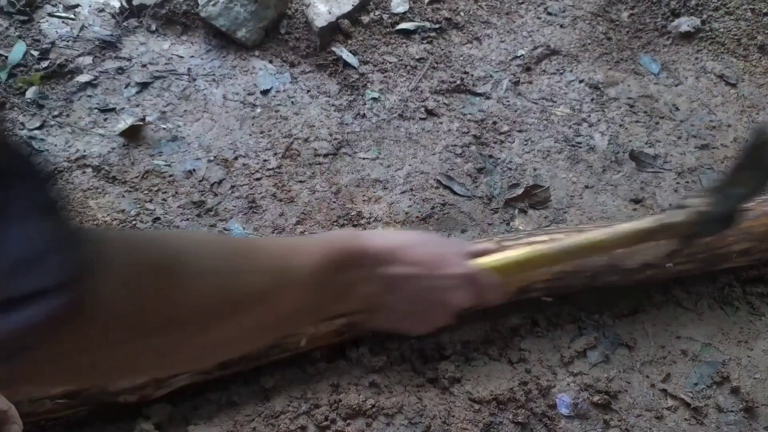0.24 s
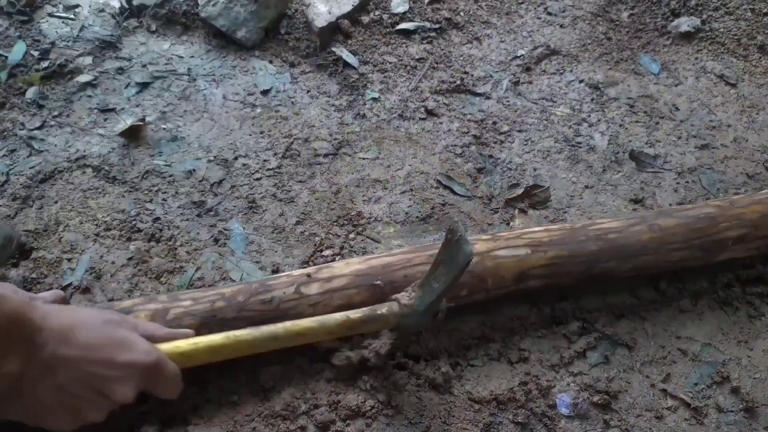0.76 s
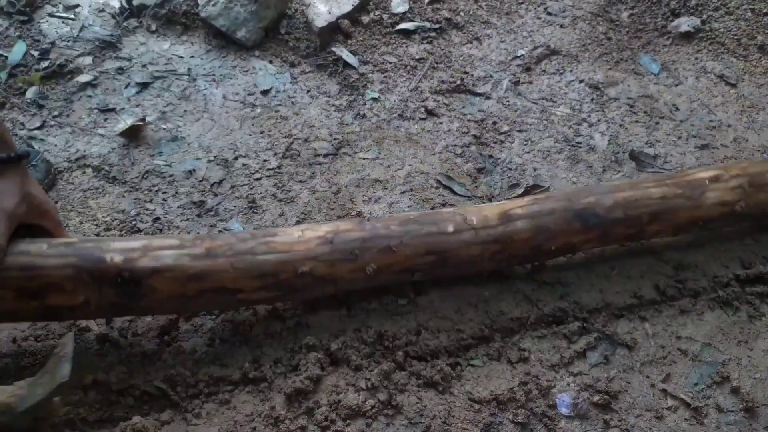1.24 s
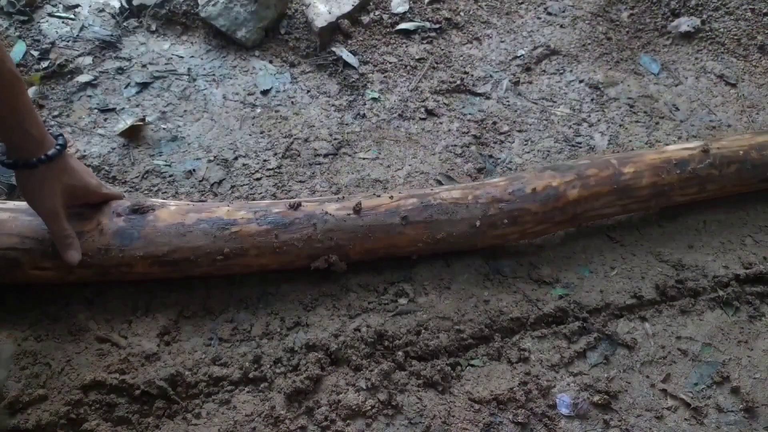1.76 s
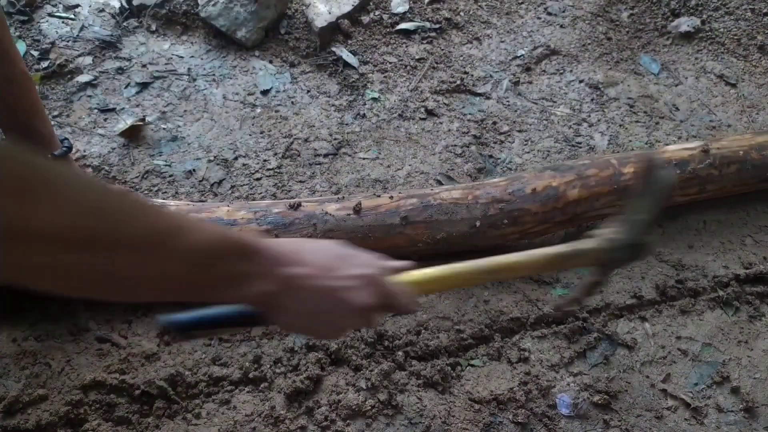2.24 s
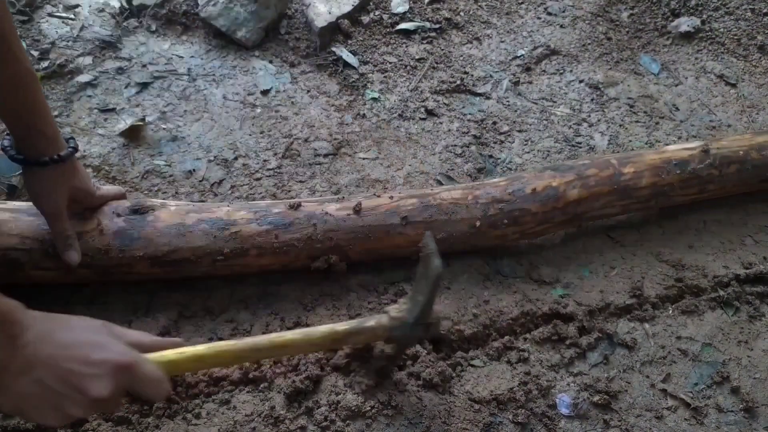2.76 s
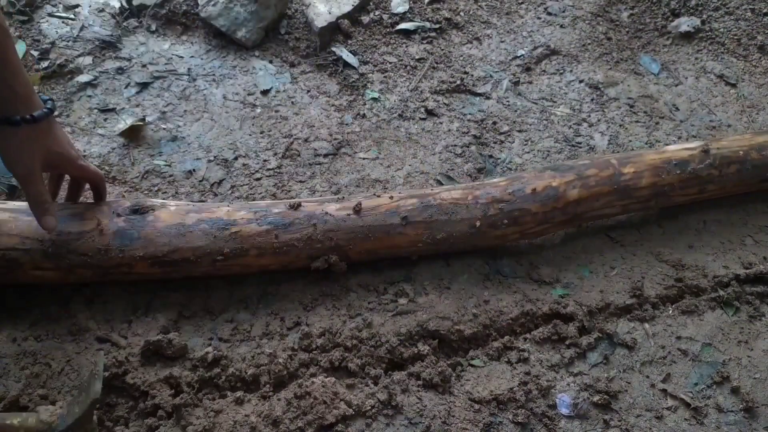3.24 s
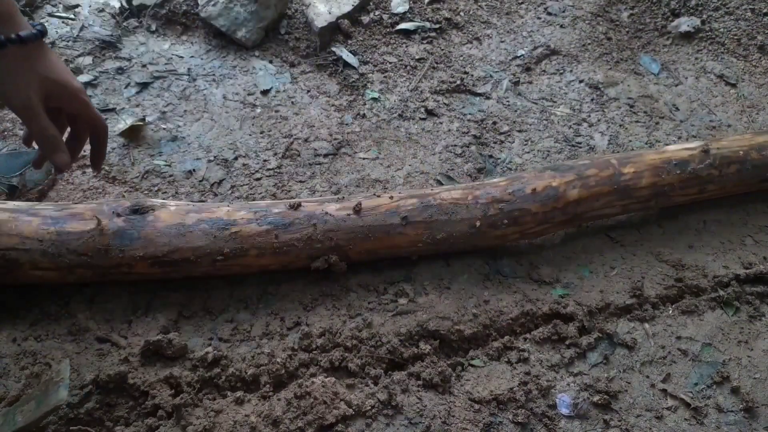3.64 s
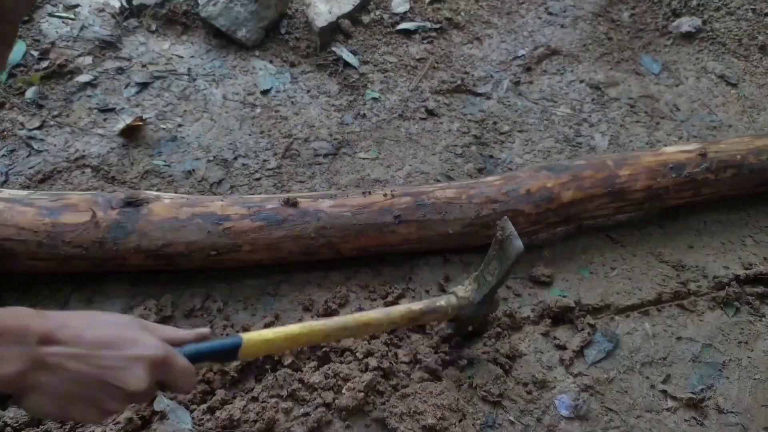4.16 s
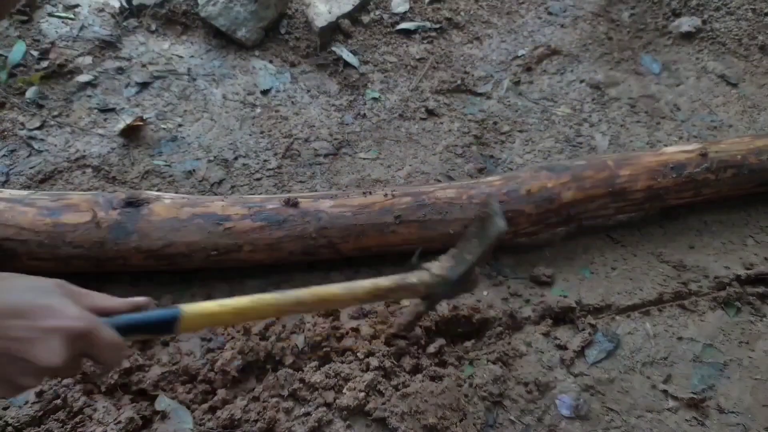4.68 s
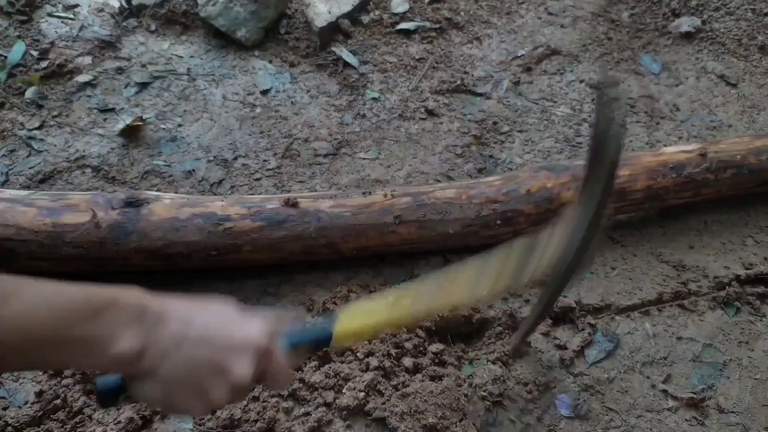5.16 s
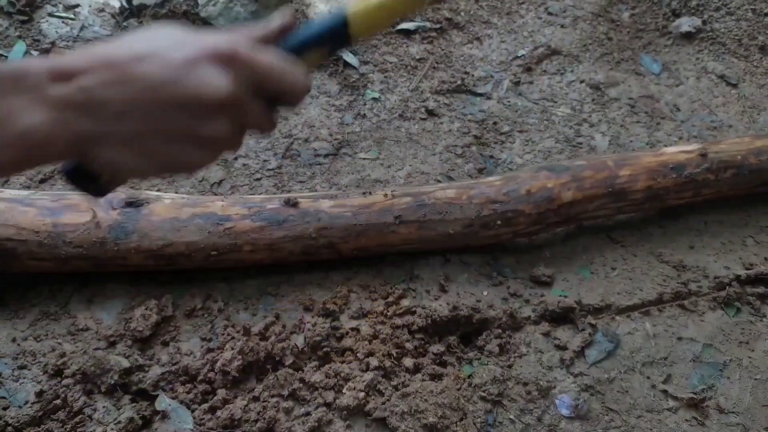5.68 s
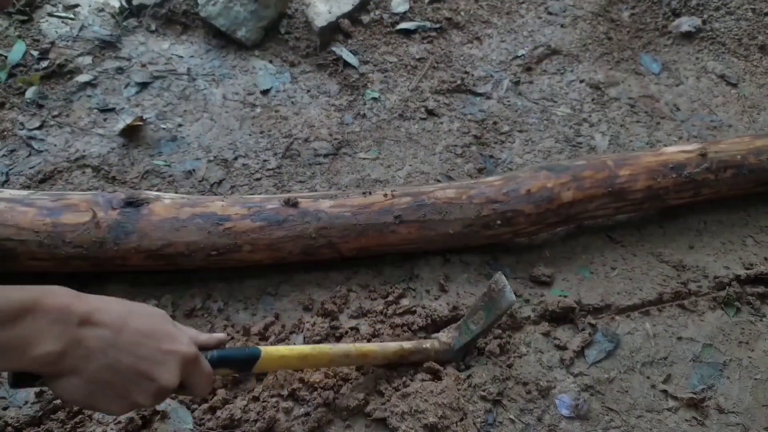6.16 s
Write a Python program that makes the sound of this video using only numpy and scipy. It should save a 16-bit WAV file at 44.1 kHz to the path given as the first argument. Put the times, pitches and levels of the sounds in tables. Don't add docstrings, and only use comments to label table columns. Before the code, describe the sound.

Scraping first: quiet gritty strokes of a pick digging a groove beside a log, with small stone clicks, soft thumps and short gaps. Then four sharp chops bite the earth, two in quick succession and two more widely spaced, each throwing a spray of soil that patters back. Thin, fluttering insects sing far behind in still air. The stereo microphone sits close, with no echo; the insect bed dips briefly after each chop.

```python
import sys
import numpy as np
from scipy import signal
from scipy.fft import rfft, irfft
from scipy.io import wavfile
from scipy.ndimage import uniform_filter1d, minimum_filter1d

SR = 44100
rng = np.random.default_rng(int(sys.argv[2]) if len(sys.argv) > 2 else 0)


def linear_from_db(decibels):
    return 10 ** (np.asarray(decibels, float) / 20)


def inscribe(sig):
    pcm = np.round(np.clip(np.atleast_2d(sig).T, -1, 1) * 32767)
    wavfile.write(sys.argv[1], SR, pcm.astype(np.int16))


N = 282681

SIDE = np.c_[[.5, -.5]]

# freq_hz, level_db, t60_s
EDGE = [(4200, -4, .005), (5200, -6, .004), (6700, -2, .008), (7600, -2, .005), (8300, -1, .008),
        (9400, -4, .004)]
# freq_hz, level_db, t60_s
BLADE = [(1300, -3, .012), (1650, -3, .01), (2060, 0, .014), (2450, -1, .011), (2900, -2, .013),
         (3500, -7, .007)]
# freq_hz, level_db, t60_s, left_right_db, left_lag_rad
GROUND = [(154.6, 8, 0.087, 0.35, 0.52), (188.7, 3, 0.069, 2, .3), (116, -2, 0.0897, 0.5, 0.6)]
# freq_hz, level_db, t60_s, left_right_db, left_lag_rad
DEEP = [(79, -9.5, 0.26, -13.5, 0.23)]
# top_s, spray_db
SPRAYS = [
    (4.103, -36),
    (4.585, -37),
    (5.183, -32.5),
    (6.016, -33.5),
]


def chops():
    # start_s, blade_db, edge_share_db, blade_pitch_hz, crush_ms
    contacts = [
        (4.0833, -10, -6, 2730, 1.6),
        (4.086, -19.5, 2, 1680, 0.93),
        (4.0965, -5, -14.5, 2180, 0.92),
        (4.0995, -13.5, -4, 1243, 2.9),
        (4.574, -10, -1, 1331, 2.2),
        (5.1733, -8, -4.5, 1980, 2.5),
        (6.0105, -12, 2, 2340, 1.2),
        (6.0137, -9, -13, 1560, 1.5),
        (6.0224, -13.5, -11.5, 2135, 2.6),
        (6.0252, -7.5, -20.5, 2055, 0.59),
    ]
    # freq_hz, level_db, t60_s
    tip = [(10900, 5.5, .004), (12800, 4.5, 0.0048), (14600, 2, 0.005)]
    # start_s, neck_db, handle_db, ground_db, deep_ground_share_db
    knocks = [
        (4.0832, -23, -29, -45, -8.5),
        (4.099, 2, -16.5, -25.5, -2),
        (4.5769, -2, -5, -15, -3.5),
        (5.176, -8.5, -6, -13, -4.5),
        (6.013, -19.5, -12, -28.5, -11),
        (6.0285, -28.5, -10.5, -21, -3.5),
    ]
    # freq_hz, level_db, t60_s, left_right_db, left_lag_rad
    neck = [(1100, -8.5, 0.029, -9.5, 0.51), (1415, -3, 0.017, 3.5, 1), (1620, -3.5, 0.014, -5, 0.94)]
    out = np.zeros((2, N))
    for s, blade_db, edge_db, blade_hz, crush_ms in contacts:
        pan_db = -9.5 - 0.62 * edge_db
        edge = lag_left(strike(EDGE, blade_db + edge_db + 10, 0.8 * crush_ms, 0.24, 5200.0))
        point = strike(tip, blade_db + edge_db - 13, 0.14 * crush_ms, 0.12)
        blade = lag_left(strike(BLADE, blade_db + 2.66, crush_ms, 0.71, blade_hz, focus_db=15.5))
        add(out, s - .0004, edge + point)
        add(out, s + 0.00064, blade * linear_from_db(SIDE * pan_db))
    for s, neck_db, handle_db, ground_db, deep_db in knocks:
        add(out, s, thud(ground_db, handle_db, deep_db))
        add(out, s, knock(neck, neck_db - 8.0, rise_ms=0.65))
    return out


def pebbles():
    # start_s, strength_db, edge_share_db
    on_point = [(0.0169, -19, -1), (0.0244, -33, -27), (0.488, -32, 1), (0.492, -33, 7),
                (0.5133, -27.5, 0.5), (0.607, -20, -8), (0.651, -26.5, -4), (0.6578, -37, 6.5),
                (0.81, -40, -8), (0.9432, -27.5, -22), (1.6574, -40, 11), (1.6744, -41, -11),
                (2.3454, -23, -2), (2.3753, -24.5, -5), (2.5075, -47, 14), (2.5227, -30, -1),
                (2.5656, -33, -6), (2.583, -25.5, -23), (2.6347, -35, 14), (2.691, -26, -5),
                (2.7237, -27, -1), (2.933, -31, -6), (3.0024, -24.5, -31), (3.0272, -25.5, -6.5),
                (3.0722, -34, 4), (4.5974, -24, -6.5), (5.4287, -29, 0)]
    # start_s, strength_db, edge_share_db
    on_flank = [(0.865, -33, -12), (0.8725, -37, -2), (0.9068, -25, -9), (0.9326, -22, -26),
                (1.1565, -48, -12), (1.2655, -42.5, 14.5), (1.4536, -35.5, 2), (1.4917, -52, 13),
                (2.9178, -43.5, 14.5), (3.1474, -32, -18), (5.3442, -23, -20)]
    edge_modes = EDGE + [(11300, -11, 0.0014), (14100, -12, .004)]
    out = np.zeros((2, N))
    for rows, blade_hz in ((on_point, 2930), (on_flank, 1930)):
        for s, db, edge_db in rows:
            pan_db = -9 + 1 * rng.standard_normal()
            crush_ms = 0.53 + 0.44 * (db + 29)
            blade = strike(BLADE, db - 5.0, crush_ms, 0.38, blade_hz, focus_db=21.5)
            edge = strike(edge_modes, db + edge_db + 4, crush_ms, 0.077, 8000., focus_db=10.5)
            add(out, s, blade * linear_from_db(SIDE * pan_db) + edge * linear_from_db(0.29 * SIDE * pan_db))
    return out


def bumps():
    # start_s, ground_db, handle_db, deep_ground_share_db
    dull = [(0.0, -39, -45, 10), (0.039, -49, -48, 17), (0.367, -45, -46.5, 3), (0.472, -70, -44.5, 6),
            (0.591, -57.5, -64, 21), (0.68, -41, -54, -1), (0.863, -39, -36.5, 3),
            (0.932, -27.5, -40.5, -9), (1.027, -36.5, -50, -17), (1.459, -33.5, -44, -0.5),
            (1.68, -33.5, -51, -6), (1.738, -37, -67, -4), (2.366, -37.5, -52, 4.5),
            (2.593, -37, -49.5, 4.5), (2.742, -40, -76, 7), (3, -37.5, -44, 0), (3.1, -42, -48, -10),
            (3.162, -36, -65, -5), (3.313, -62, -50, 2), (3.425, -44, -74, 0), (4.24, -53, -54.5, 13),
            (4.69, -43, -49, -5), (5.352, -31.5, -45, 10)]
    # start_s, level_db, freq_hz, t60_s
    shoves = [
        (1.466, -36.5, 34.6, 0.23),
        (4.101, -35, 44.7, 0.081),
        (4.579, -29, 51.6, .08),
        (5.173, -23, 57.2, .07),
        (6.021, -47, 50.6, .08),
    ]
    out = np.zeros((2, N))
    for s, ground_db, handle_db, deep_db in dull:
        add(out, s, thud(ground_db - 8.0, handle_db + 11.5, deep_db, rise_ms=1.6, tilt_db=-26))
    for s, db, hz, t60 in shoves:
        add(out, s, knock([(hz, 4, t60, -2.5, .3)], db, rise_ms=19.0))
    return out


def strike(modes, db, crush_ms, same, favour_hz=None, focus_db=8):
    t_ms = np.arange(1300) / SR * 1000
    envelope = np.exp(-t_ms / max(crush_ms, .1)) * (1 - np.exp(-t_ms / 0.032))
    crunch = pair(len(t_ms), same) * envelope
    out = signal.fftconvolve(crunch, ring(modes, 1500, favour_hz, focus_db)[None])
    return linear_from_db(db) * out / abs(out).max()


def ring(modes, size, favour_hz=None, focus_db=8):
    hz, db, t60 = np.transpose(modes)[:3, :, None]
    t = np.arange(size) / SR
    if favour_hz:
        db = db - focus_db * abs(np.log2(hz / favour_hz))
    envelope = linear_from_db(db - 60 * t / t60) * (1 - np.exp(-t * hz / .25))
    return (envelope * np.sin(2 * np.pi * hz * t)).sum(0)


def lag_left(x):
    return np.array([np.roll(x[0], 4), x[1]])


def thud(ground_db, handle_db, deep_db, rise_ms=0.69, tilt_db=0):
    # freq_hz, level_db, t60_s, left_right_db, left_lag_rad
    handle_modes = [(493, 13.5, 0.017, 1.5, 0.35), (830, -10.5, 0.075, 1, .4), (650, -4.5, 0.036, 2, 0.32),
                    (345, -2, 0.028, 4, 0.21)]
    tilted = [(hz, db + tilt_db * np.log2(hz / 400), *rest) for hz, db, *rest in handle_modes]
    out = np.zeros((2, SR // 2))
    add(out, 0, knock(GROUND, ground_db, 7.4))
    add(out, 0, knock(DEEP, ground_db + deep_db, 4.0))
    add(out, 0, -knock(tilted, handle_db - 9, rise_ms))
    return out


def knock(modes, db, rise_ms):
    hz, mode_db, t60, pan_db, lag_rad = np.transpose(modes)[:, :, None, None]
    t = np.arange(round(1.5 * SR * t60.max())) / SR
    level = linear_from_db(mode_db + SIDE * pan_db - 60 * t / t60)
    waves = level * np.sin(2 * np.pi * hz * t - SIDE * np.clip(lag_rad, -1, 1))
    return linear_from_db(db) * waves.sum(0) * (1 - np.exp(-1000 * t / rise_ms))


def digging():
    # freq_hz, density_db_per_hz
    grit_db = [(530, -34), (900, -6.5), (1090, -13), (1570, -5.5), (2500, -5.5), (2930, -1.5), (3640, -14),
               (4740, -10), (5550, -13), (7770, -3), (10600, -18), (14400, -26), (16000, -43)]
    # freq_hz, left_right_db
    tool_pan = [(60, -16.5), (150, 0), (380, -15), (950, -2), (2380, -10.5), (5980, -6), (15000, 1)]
    # freq_hz, level_db, t60_s
    sing_modes = [(2025, -1.5, 0.01982), (2934, -5.5, 0.022), (6400, -1, 0.017), (8700, -7.5, 0.043)]
    t = np.arange(N) / SR
    steady = pressure(t)
    thrown = puffs(t)
    drag, bright, handle = steady[:3] + thrown[:3]
    rumble, sing = steady[3], thrown[3]

    sand = colour(grit(), grit_db, tool_pan)
    dull = signal.sosfilt(signal.butter(4, 5200, fs=SR, output="sos"), sand)
    sharp = signal.sosfilt(signal.butter(4, 5700, "high", fs=SR, output="sos"), sand)
    shake = signal.sosfilt(signal.butter(2, [250, 900], "band", fs=SR, output="sos"), pair(N, 1.0))
    ground = ring(GROUND + DEEP, size=4000) * linear_from_db(-300 * np.arange(4000) / SR)
    soil = signal.fftconvolve(pair(N, 0.25), ground[None])[:, :N]
    steel = signal.oaconvolve(pair(N, 0.26), ring(sing_modes, size=1200)[None])[:, :N]

    out = evened(dull) * drag + linear_from_db(-1.5) * evened(sharp) * bright
    out += evened(steel) * sing
    return out + linear_from_db(-1.5) * evened(shake) * handle + evened(soil) * rumble


def grit():
    size = linear_from_db(3.5 * np.minimum(rng.exponential(1, N), 3))
    grains = size * (rng.random(N) < 900 / SR)
    lumps = np.convolve(grains, np.exp(-np.arange(300) / 45))[:N]
    return pair(N, .2) * (.6 + evened(lumps))


def pressure(t):
    # time_s, pressure_db
    pulls = [
        [(0.0, -46), (0.13, -71.5), (0.33, -61), (0.39, -54.5), (0.54, -55), (0.84, -55.5), (0.99, -50),
         (1.09, -83), (1.25, -57.5)],
        [(1.25, -58), (1.5, -68.5), (1.63, -90), (1.69, -66), (1.8, -55), (2.0, -112)],
        [(2.3, -59), (2.4, -65.5), (2.52, -55), (2.75, -59.5), (3.03, -55), (3.15, -51.5), (3.28, -79),
         (3.58, -67), (3.7, -94)],
        [(6.25, -98), (6.41, -61.5)],
    ]
    # offset_db, slope_db_per_db
    follow = [(-2.5, 1.3), (3, 0.38), (-13.5, 1.1), (-5, 2.2)]
    usual_db = -56.5
    trickle_db, trickle_t60_s, trickle_wait_s = -68, 1, 0.056
    push = sum(linear_from_db(np.interp(t, *np.transpose(rows), -200, -200)) for rows in pulls)
    for s, _ in SPRAYS:
        late = t - s - trickle_wait_s
        push = push + linear_from_db(trickle_db - 60 * abs(late) / trickle_t60_s) * (late > 0)
    offset_db, slope = np.transpose(follow)[:, :, None]
    return linear_from_db(usual_db + offset_db) * (push / linear_from_db(usual_db)) ** slope


def puffs(t):
    # top_s, blade_db, edge_share_db, t60_s
    scuffs = [(0.537, -38.5, -2, 0.088), (0.88, -45.5, 2.5, 0.67), (1.045, -57.5, 6.5, 0.14),
              (1.484, -52.5, 1, 0.23), (1.68, -51.5, 9.5, 0.1), (1.713, -46.5, -7, 0.045),
              (1.83, -62.5, 2, 0.58), (2.52, -56, 13, 0.063), (2.595, -45.5, 1.5, 0.16),
              (3.002, -48.5, 2, 0.23), (3.112, -48.5, 1, 0.059), (3.16, -60.5, 8, 0.12),
              (3.54, -68.5, 12.5, 0.15), (4.69, -62, -14, 0.13), (6.384, -49, -12, 0.13)]
    # top_s, blade_db, edge_share_db, t60_s
    bursts = [(0.023, -39.5, 6.5, 0.091), (0.389, -51, 6, 0.05), (.493, -45, 9, 0.074),
              (0.606, -39.5, -1.5, 0.22), (.66, -42, 16, 0.033), (0.909, -41, -11, 0.065),
              (0.939, -56, 9, 0.15), (1.161, -50, -7, 0.04), (2.348, -40, 4, 0.21), (2.727, -49, -3, 0.14),
              (5.319, -47, -2, 0.26), (5.343, -47, 4, 0.045)]
    sprays = [(s, db, 1, 0.18) for s, db in SPRAYS]
    entries = [(s - .011, db - 14, 5, .034) for s, db in SPRAYS[1:]]
    # rows, rise_ms, handle_share_db, sing_share_db
    kinds = ((scuffs, 23.6, -7, -30), (bursts, 2.9, -14.5, -25),
             (sprays, 4, -5, -3.6), (entries, 2.5, -20, -5))
    levels = np.zeros((4, N))
    for rows, rise_ms, handle_db, sing_db in kinds:
        for s, db, edge_db, t60 in rows:
            first = max(round((s - rise_ms / 250) * SR), 0)
            near = slice(first, round((s + t60) * SR))
            late = t[near] - s
            shape = np.where(late < 0, np.exp(-(1000 * late / rise_ms) ** 2), linear_from_db(-60 * late / t60))
            levels[:, near] += linear_from_db(db + np.c_[[0, edge_db, handle_db, sing_db]]) * shape
    return levels


def forest():
    # freq_hz, density_db_per_hz
    air = [(20, -2.5), (60, -18.5), (200, -17.5), (700, -25), (2000, -29), (3300, -28), (4000, -26),
           (5450, -44.5), (7000, -27.5), (9300, -26.5), (10500, -32.5), (13000, -36), (16000, -32)]
    # freq_hz, left_right_db
    air_pan = [(60, -2.5), (150, -4), (380, -3), (950, -3), (2380, -8.5), (5980, 6.5), (15000, -7.5)]
    # centre_hz, width_hz, level_db, flutter_db
    choirs = [(4750, 940, -56, 1.5), (6126, 780, -53, 1.5), (7000, 2400, -63.5, 3)]
    hz = np.fft.rfftfreq(N, 1 / SR)
    out = linear_from_db(-58.5) * evened(patchy(colour(pair(N, 0.04), air, air_pan), patch_db=2.5))
    for centre_hz, width_hz, db, flutter_db in choirs:
        shape = np.exp(-abs(2 * (hz - centre_hz) / width_hz) ** 3.4)
        band = irfft(rfft(pair(N, .05)) * shape, N)
        flutter = evened(uniform_filter1d(uniform_filter1d(rng.standard_normal(N), 500), 300))
        out += linear_from_db(db + flutter_db * flutter) * evened(band)
    return out


def patchy(x, patch_db):
    z = signal.stft(x, nperseg=512)[2]
    patches = uniform_filter1d(uniform_filter1d(rng.standard_normal(z.shape[1:]), 8, 0), 14, 1)
    return signal.istft(z * linear_from_db(patch_db * evened(patches)), nperseg=512)[1][:, :N]


def evened(x):
    return x / np.sqrt(np.mean(x ** 2) + 1e-20)


def read(points, hz):
    f, value = np.transpose(points)
    return np.interp(np.log(hz + 1), np.log(f + 1), value)


def colour(x, level, pan):
    hz = np.fft.rfftfreq(x.shape[1], 1 / SR)
    gain_db = read(level, hz) + SIDE * read(pan, hz)
    return irfft(rfft(x) * linear_from_db(gain_db), x.shape[1])


def pair(size, same):
    a, b, c = rng.standard_normal((3, size))
    same = np.clip(same, 0, 1)
    return np.sqrt(same) * a + np.sqrt(1 - same) * np.array([b, c])


def add(mix, s, sound):
    part = mix[:, round(s * SR):][:, :sound.shape[1]]
    part += sound[:, :part.shape[1]]


def scene():
    tool = chops() + pebbles() + bumps() + digging()
    power_db = 10 * np.log10(abs(uniform_filter1d((tool ** 2).mean(0), 200)) + 1e-12)
    fall_db = np.arange(N) * 100.0 / SR
    held_db = np.maximum.accumulate(power_db + fall_db) - fall_db
    over_db = np.maximum(held_db + 27.5, 0)
    return tool + forest() / linear_from_db(.45 * uniform_filter1d(over_db, 200))


def thin(x, masked_db, sparse_db):
    frame = dict(nperseg=2048, noverlap=1024, window="cosine")
    hz, _, z = signal.stft(x, SR, **frame)
    power = (abs(z) ** 2).mean(0)
    band_db = 10 * np.log10(power[:1020].reshape(170, 6, -1).mean(1) + 1e-20)
    band_db = uniform_filter1d(band_db, size=2, axis=1)
    masked = band_db < -minimum_filter1d(-band_db, size=13, axis=0) - masked_db
    masked = np.repeat(masked, 6, 0) & (hz[:1020, None] > 3000)
    around = uniform_filter1d(uniform_filter1d(power, size=30, axis=0), size=3, axis=1)
    weak = power < linear_from_db(2 * sparse_db) * around
    drop = (weak & (hz[:, None] > 9700)) | (hz[:, None] > 15800)
    drop[:1020] |= masked
    steady = band_db.max(0) < -49
    return signal.istft(z * (1 - .98 * (drop & steady)), SR, **frame)[1][:, :N]


def top_cut(x):
    return signal.sosfilt(signal.butter(12, 16500, fs=SR, output="sos"), x)


def record(dry):
    held = dry / (1 + (dry / 1.05) ** 6) ** (1 / 6)
    held = thin(held, masked_db=16, sparse_db=1.8)
    held = signal.oaconvolve(held, signal.firwin(255, 16300, fs=SR)[None], "same")
    return top_cut(held)


dry = scene()
out = record(dry)
inscribe(out)
```